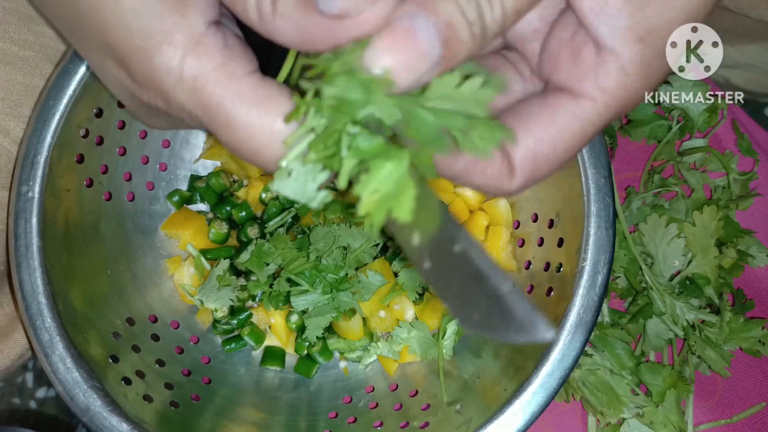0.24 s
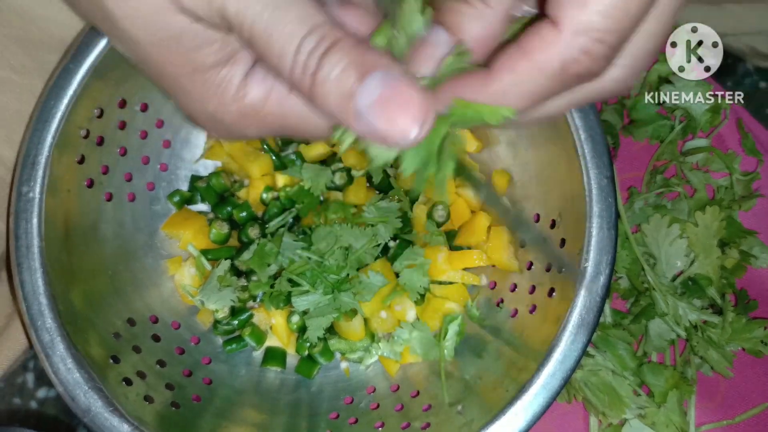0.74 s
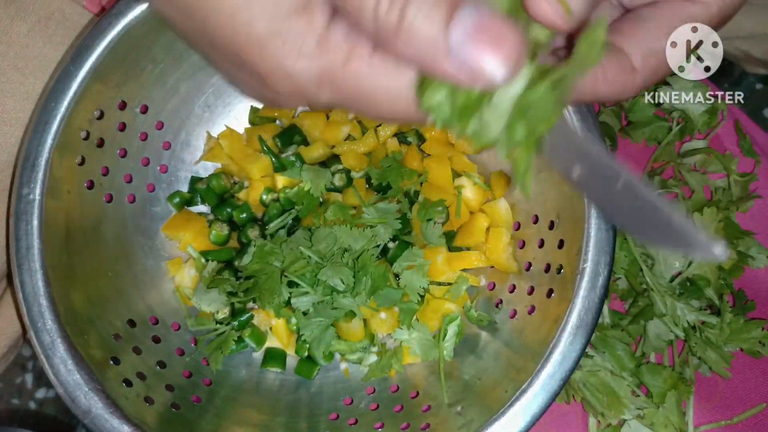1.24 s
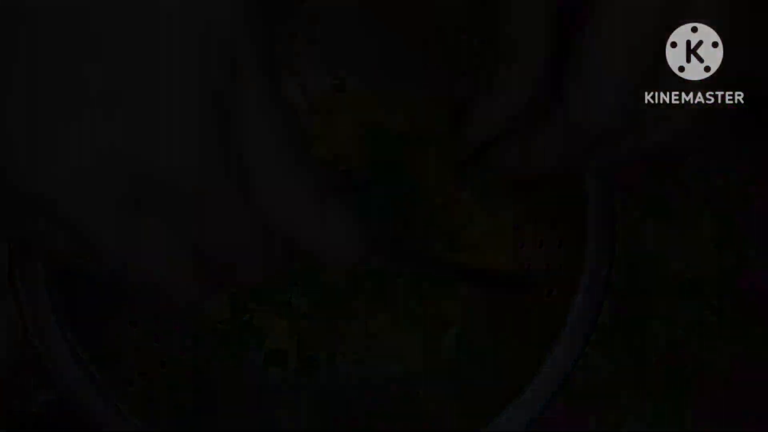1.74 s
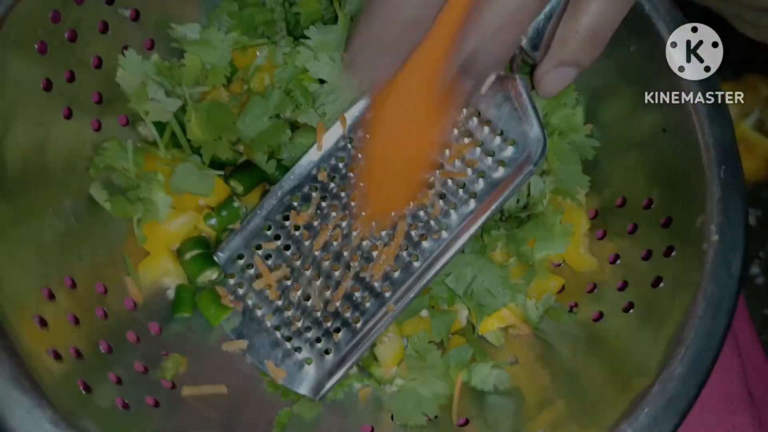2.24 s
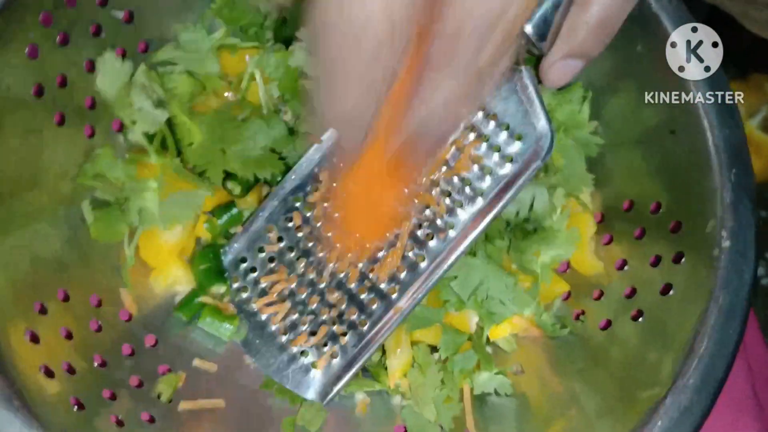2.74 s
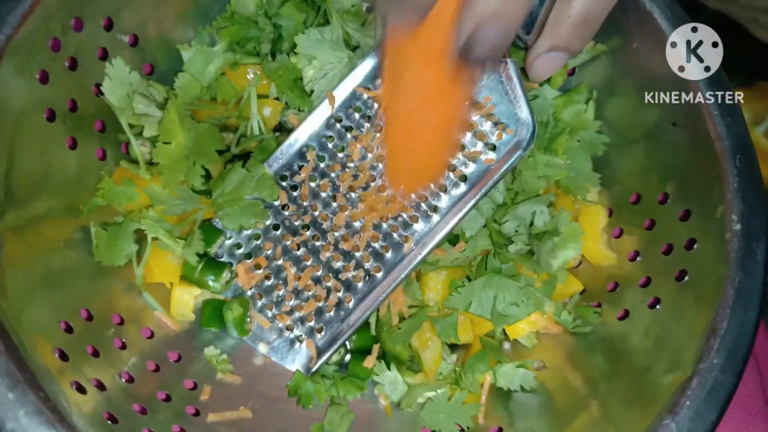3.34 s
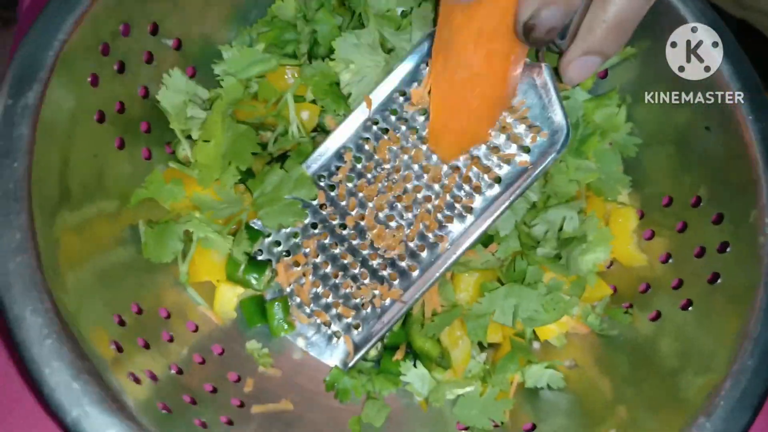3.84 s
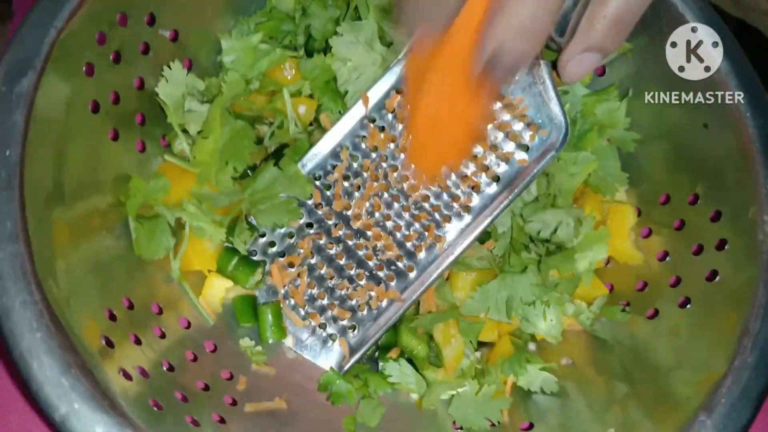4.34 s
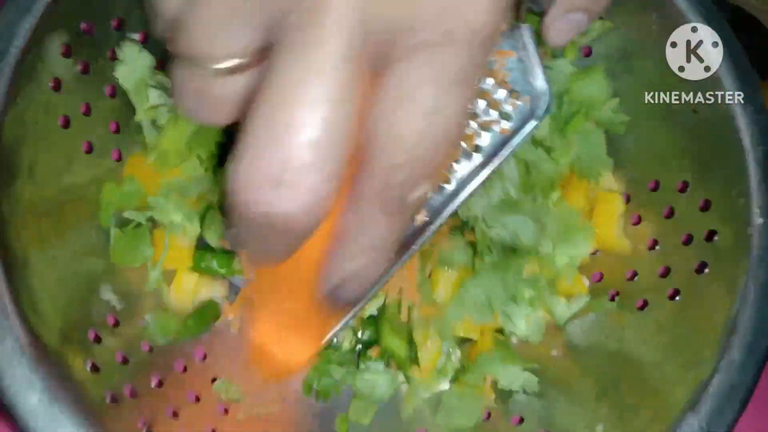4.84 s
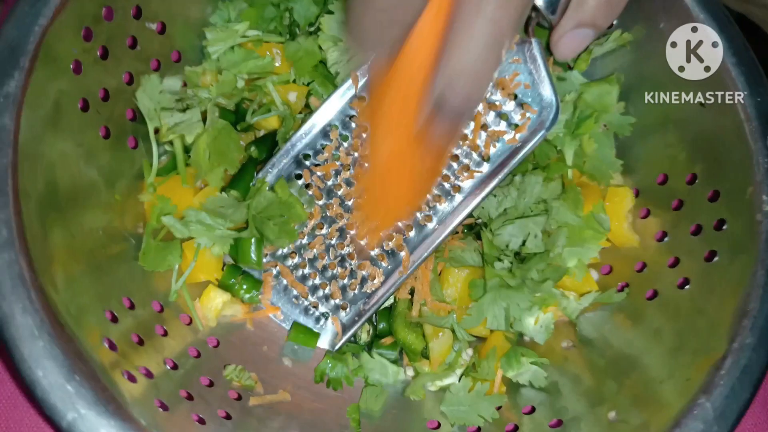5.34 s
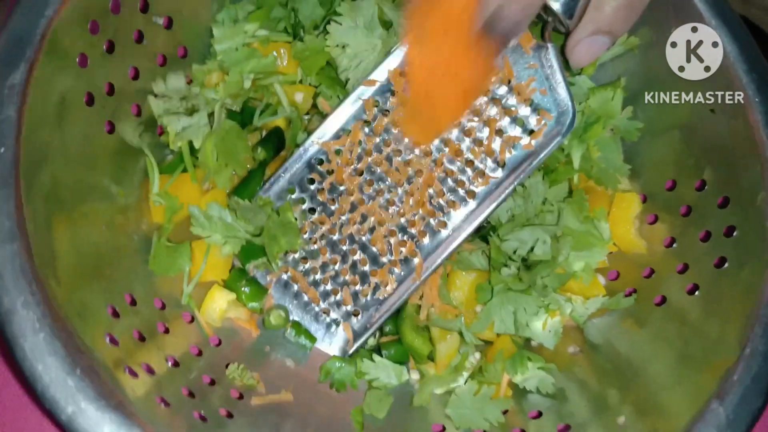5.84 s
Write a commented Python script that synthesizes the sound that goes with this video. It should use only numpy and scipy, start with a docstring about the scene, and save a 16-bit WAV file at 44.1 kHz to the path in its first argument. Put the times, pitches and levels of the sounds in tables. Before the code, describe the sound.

A short, bright click opens the sound. For the first second and a half, herb leaves rustle faintly as they are pulled apart, with tiny stem snaps around 0.8 seconds and three soft, low bumps on a steel colander. From about 1.5 seconds the herbs fade away and the grating of a carrot on a metal grater fades in, reaching full strength near 2.7 seconds. The rasping continues to the end at just past 6 seconds, about three or four strong downstrokes a second with lighter return strokes between them. The downstrokes make the grater judder and the table thump dully, while the colander drones faintly and takes occasional soft knocks. A few small metallic ticks come just before 5 seconds. The grating is close and louder on the left. A low kitchen appliance hum lies underneath, a little louder and boomier during the grating.

```python
"""Tearing herbs, grating a carrot

Hands tear herb leaves over a steel colander; the scene then fades over to a carrot pushed up and down
a flat steel grater resting in it. Teeth shred the carrot with a rasp, rows of teeth make the grater
judder and the table thump, and the colander drones and knocks. Kitchen appliances hum behind it all.
The left microphone port faces the grater; the right one is shaded from it."""
import sys
import numpy as np
from scipy import signal
from scipy.io import wavfile

SR = 44100
rng = np.random.default_rng(int(sys.argv[2]) if len(sys.argv) > 2 else 0)


def materialize(psi):
    """Save the field psi as 16-bit PCM at rate SR to the path in sys.argv[1].

    A 1-D psi becomes a single channel; in a 2-D psi each row is a channel.
    """
    bounded = np.clip(np.atleast_2d(psi).T, -1, 1)
    quanta = np.round(bounded * 32767).astype(np.int16)
    wavfile.write(sys.argv[1], SR, quanta)


N = 268562
T = np.arange(N) / SR

# Strokes down and back up the grater. Each row: bite time, swell length and hold length in seconds,
# crest level in dB, depth of the swell in dB.
STROKES = [(1.557, 0.083, 0.034, -55.0, 9.5), (1.736, 0.061, 0.004, -57.0, 4.5),
           (1.855, 0.043, 0.019, -47.5, 3.5), (2.018, 0.029, 0.022, -51.5, 8.0),
           (2.117, 0.072, 0.01, -41.5, 5.0), (2.257, 0.057, 0.026, -47.0, 11.5),
           (2.373, 0.057, 0.016, -37, 9), (2.546, 0.041, 0.023, -47.5, 5.0),
           (2.647, 0.061, 0.006, -29.0, 16.5), (2.764, 0.092, 0.022, -39.5, 12.0),
           (2.921, 0.054, 0.035, -29.0, 15.5), (3.042, 0.085, 0.024, -43.0, 0.5),
           (3.2, 0.028, 0.054, -36.0, 3.0), (3.342, 0.06, 0.023, -47.0, 0.5),
           (3.465, 0.044, 0.029, -33.0, 8.5), (3.592, 0.061, 0.023, -41.0, 5.5),
           (3.72, 0.06, 0.024, -34.0, 10.0), (3.881, 0.062, 0.004, -42.0, 7.0),
           (3.998, 0.051, 0.03, -33.5, 7.0), (4.146, 0.065, 0.025, -43.0, 10.5),
           (4.279, 0.059, 0.004, -36.0, 3.5), (4.433, 0.046, 0.011, -45.0, 7.5),
           (4.519, 0.008, 0.004, -47.5, 8.0), (4.566, 0.054, 0.017, -33.0, 6.5),
           (4.69, 0.084, 0.004, -38.5, 12.0), (4.845, 0.054, 0.036, -31.0, 8.0),
           (4.963, 0.058, 0.06, -41.0, 0.5), (5.126, 0.065, 0.043, -33.5, 7),
           (5.282, 0.03, 0.056, -43.5, 0.5), (5.426, 0.077, 0.011, -31.5, 5.5),
           (5.565, 0.06, 0.04, -38.0, 7.0), (5.717, 0.055, 0.038, -32.0, 6.0),
           (5.885, 0.07, 0.004, -42.5, 7.5), (6.013, 0.05, 0.06, -34.5, 3.5)]
# Downstrokes that jolt the grater. Each row: time in seconds, judder and thump levels in dB,
# tooth rows passed per second, seconds to build 10 dB, seconds for the judder to die 10 dB.
JOLTS = [ (1.665, -48.5, -62, 243, .1, .03), (1.914, -39.5, -53, 210, .07, .03),
         (2.185, -32.5, -41, 226, .055, .026), (2.446, -27, -35, 252, .029, .015),
         (2.7, -20.5, -28, 175, .008, .028), (2.983, -17.5, -27, 207, .004, .017),
         (3.271, -38, -48, 185, .023, .017), (3.544, -24.5, -26, 184, .014, .01),
         (3.765, -32, -42, 187, .035, .1), (4.045, -31.5, -27, 175, .01, .035),
         (4.348, -29, -35, 253, .058, .015), (4.588, -30, -42, 171, .023, .15),
         (4.89, -36, -34, 150, .1, .06), (5.2, -34, -36, 225, .1, .3), (5.488, -31.5, -37, 191, .05, .021),
         (5.791, -25, -31, 210, .024, .029), (6.072, -35, -34, 237, .035, .3), ]


def from_db(db):
    """Decibels to gain."""
    return 10 ** (np.asarray(db) / 20)


def rms_one(x):
    """Scale to rms 1."""
    return x / np.sqrt(np.mean(x ** 2) + 1e-20)


def at_hz(points, hz):
    """Read a curve on a log-frequency axis."""
    return np.interp(np.log(hz), np.log(np.array(points)[:, 0]), np.array(points)[:, 1])


def panned(x, left_db):
    """Place a sound by its pan: left minus right level in dB."""
    return x * from_db(np.array([left_db / 2, -left_db / 2]).reshape(2, -1))


def filtered(x, order, hz, kind):
    """Butterworth filter."""
    return signal.sosfilt(signal.butter(order, hz, kind, fs=SR, output="sos"), x)


def resonate(x, hz, width_hz):
    """Two-pole resonance with gain 1 at its peak."""
    r = np.exp(-np.pi * width_hz / SR)
    poles = [1, -2 * r * np.cos(2 * np.pi * hz / SR), r * r]
    return signal.lfilter([(1 - r * r) / 2, 0, (r * r - 1) / 2], poles, x)


def drift(rate_hz):
    """Smooth random wander of rms 1."""
    r = np.exp(-80 * np.pi * rate_hz / SR)
    slow = signal.lfilter([1], [1, -2 * r, r * r], rng.standard_normal(N // 40 + 2002))[2000:]
    return np.interp(np.arange(N) / 40, np.arange(len(slow)), rms_one(slow))


def swell(s, peak_db, build_s, die_s, t):
    """Level in dB that climbs 10 dB per build_s to a peak at s, then falls 10 dB per die_s."""
    return peak_db - 10 * np.where(t < s, (s - t) / build_s, (t - s) / die_s)


def grains(per_s, spread_db):
    """Four unrelated streams of tiny clicks of uneven size."""
    sizes = from_db(spread_db * np.minimum(rng.exponential(1, (2, 2, N)), 5))
    clicks = sizes * rng.standard_normal((2, 2, N))
    return rms_one(clicks * (rng.random((2, 2, N)) < per_s / SR))


def banded(source, colour, flicker_db, flicker_hz, balance=((20, 0), (20000, 0))):
    """Stereo texture of half-octave bands, each with its own level, flicker, width and pan; mid rms 1."""
    # How alike the two ports sound. Each row: frequency in Hz, correlation from 0 to 1.
    likeness = [(130, 0.99), (290, 0.89), (640, 0.55), (1400, 0), (3000, 0.0)]
    out, edges = 0, 22 * 2 ** np.arange(0, 9.6, .5)
    for k, (low, high) in enumerate(zip(edges, edges[1:])):
        hz = np.sqrt(low * high)
        if hz < colour[0][0]:
            continue
        mid, side = filtered(source[k % 2], 2, [low, high], "band")
        alike = at_hz(likeness, hz)
        stereo = np.sqrt(1 + alike) * mid + np.sqrt(1 - alike) * side * [[1], [-1]]
        gain = from_db(at_hz(colour, hz) + flicker_db * drift(flicker_hz))
        ports = np.array([[1], [from_db(-at_hz(balance, hz))]])
        out = out + gain * ports / ports.mean() * stereo
    return out / np.sqrt(np.mean(out.mean(axis=0) ** 2))


def pings(rows, cycles):
    """Each row (seconds, dB, Hz) strikes a damped ring that takes so many cycles to fall to 1/e."""
    out, age = np.zeros(N + SR // 8), np.arange(SR // 8) / SR
    for s, db, hz in rows:
        ring = np.sin(2 * np.pi * hz * age) * np.exp(-age * hz / cycles)
        out[int(s * SR):][:len(age)] += from_db(db) * ring
    return out[:N]


def room(colour, air_db, tones, waver_db):
    """Broad room noise and the wavering tones of appliance motors."""
    air = from_db(air_db) * banded(rng.standard_normal((2, 2, N)), colour, flicker_db=2, flicker_hz=6.8)
    hum = 0
    for hz, db in tones:
        amplitude = np.sqrt(2) * from_db(db + waver_db * drift(15))
        hum += amplitude * np.sin(2 * np.pi * hz * T + .86 * drift(1.4))
    return air + hum


def herb_room():
    """Quiet kitchen air and a fairly steady appliance hum behind the herbs."""
    # Colour of the air. Each row: frequency in Hz, relative level in dB.
    colour = [(15, -37), (25, -7), (70, -11.5), (137, -3), (200, -6.5), (248, -9), (299, -8.5), (672, -9.5),
              (791, -12), (2330, -20), (4210, -22), (12400, -32.5), (14600, -35), (15800, -59)]
    # Motor tones. Each row: pitch in Hz, level in dB.
    tones = [(129.2, -70), (253.0, -61), (403.7, -67), (452.2, -68.5), (592.2, -70.5), (667.5, -67.5)]
    return room(colour, air_db=-55, tones=tones, waver_db=1.5)


def leaves():
    """Leaves rub with a fine hiss as they are pulled apart, over a faint rustle of handling."""
    # Pulls. Each row: peak time in seconds, level in dB, seconds to build 10 dB, seconds to die 10 dB.
    pulls = [(0.02, -61.5, .05, .1), (0.234, -58, .047, .032), (0.44, -56.5, .006, .055),
             (0.96, -55, .08, .03), (1.127, -49, .004, .075), (1.274, -61, .008, .3)]
    # Colour of the rustle. Each row: frequency in Hz, relative level in dB.
    colour = [(1120, -48), (1900, -8), (3350, -5.5), (4180, 1.5), (6400, -9), (7910, -7), (10500, -4),
              (14000, -15.5), (15800, -33)]
    handling_db, loud_db = -71, -56
    level_db = np.maximum(handling_db, np.max([swell(*pull, T) for pull in pulls], axis=0))
    left_db = -3 + .65 * np.minimum(level_db - loud_db, 0)   # fainter rustle leans further right
    hiss = banded(grains(per_s=12000, spread_db=1.1), colour, flicker_db=1, flicker_hz=6.3)
    rub = panned(from_db(level_db) * hiss, left_db)
    return rub + from_db(1.5) * resonate(rub, 3350, 600)   # the bowl favours one band


def click_and_snaps():
    """A short, bright click at the very start; the later snaps are stems parting."""
    # The click, then the snaps. Each row: start in seconds, relative level in dB, pan in dB.
    bursts = [(0.0104, -29, 6), (0.7864, -52, -2.5), (0.7916, -43, -0.5), (0.7964, -41, 1.0),
              (0.8034, -52, -1.0), (0.8104, -44, -4), (0.823, -33.5, -1.0), (0.8284, -45, -1.0),
              (0.845, -34, 4), (1.4611, -43, 11), (1.4734, -47, 2)]
    decay_s, envelope = .0017, 0
    for s, db, left_db in bursts:
        decay = (T > s) * np.exp(-np.clip(T - s, 0, None) / decay_s)
        envelope += panned(from_db(db - 4) * decay, left_db)
    return filtered(envelope * rng.standard_normal((2, N)), 2, 3500, "high")


def bumps():
    """Hands nudge the colander into a short, low ring."""
    # Nudges. Each row: start in seconds, level in dB, pitch in Hz.
    nudges = [(0.682, -39.5, 167), (0.941, -39, 159), (1.389, -42, 162)]
    return pings(nudges, cycles=2.1)


def carrot_room():
    """Louder, boomier kitchen air and an unsteady appliance hum behind the grating."""
    # Colour of the air. Each row: frequency in Hz, relative level in dB.
    colour = [(15, -36), (25, -4.5), (184, 9), (352, -6), (437, -8), (812, -14.5), (1930, -16),
              (2590, -13.5), (6660, -39), (14200, -43.5), (15800, -39)]
    # Motor tones. Each row: pitch in Hz, level in dB.
    tones = [(393.0, -61.5), (441.4, -61.5)]
    return room(colour, air_db=-45.5, tones=tones, waver_db=4.8)


def stroke_pressure():
    """Each stroke creeps in, catches abruptly on the teeth, swells, sags while held and lifts off."""
    approach_s, approach_db, catch_s, catch_db = .11, 60, .003, 7
    linger_s, linger_db, lift_s, lift_db = .006, 2.5, .03, 38   # the last teeth linger before the lift
    sag_per_s = 12.5   # share of the swell given back per second of hold
    power = np.zeros(N)
    for s, swell_s, hold_s, crest_db, swell_db in STROKES:
        steps_s = [-approach_s, approach_s - catch_s, catch_s, swell_s, hold_s, linger_s, lift_s]
        times = s + np.cumsum(steps_s)
        sag_db = sag_per_s * swell_db * hold_s
        below_crest_db = np.array([swell_db + approach_db, swell_db + catch_db, swell_db, 0,
                                   sag_db, sag_db + linger_db, sag_db + lift_db])
        span = slice(int(times[0] * SR), int(times[-1] * SR))
        power[span] += from_db(2 * np.interp(T[span], times, crest_db - below_crest_db))
    return np.sqrt(power)


def jolted_strokes():
    """Start and end in seconds of the shaking around each jolt: its stroke plus time to settle."""
    settle_s = .014
    s, swell_s, hold_s = np.array(STROKES).T[:3]
    which = np.searchsorted(s, [jolt[0] for jolt in JOLTS]) - 1
    return np.c_[s, s + swell_s + hold_s + settle_s][which]


def tooth_rows():
    """Phase of the tooth rows passing under the carrot at an uneven rate, one cycle a row."""
    row_hz = np.interp(T, jolted_strokes().ravel(), np.repeat([jolt[3] for jolt in JOLTS], 2))
    return 2 * np.pi * np.cumsum(row_hz * (1 + .086 * drift(27))) / SR


def rasp(pressure, row_phase):
    """Fibres tear on many teeth at once, throbbing as each row bites, and ring the plate and teeth."""
    # Colour of the shredding. Each row: frequency in Hz, relative level in dB.
    colour = [(530, -27), (900, -19), (1290, -10.5), (1540, -12), (1940, -4.5), (2350, -8), (2850, -8),
              (3980, -6.5), (8780, -4), (11400, -24), (14900, -5), (15800, -23)]
    # Shading of the right port. Each row: frequency in Hz, left minus right in dB.
    shade = [(60, 0.0), (110, 0.5), (200, 1.0), (380, 40), (700, 4.5), (1290, 12.5), (2380, 3), (4400, 12),
             (8120, 17), (15000, 20)]
    # Grater plate resonances at the left port. Each row: frequency in Hz, width in Hz, gain in dB.
    plate_modes = [(1270, 47, -1.5), (1860, 70, 6.5), (2005, 60, 11.5), (3920, 130, 3)]
    # Resonance at the right port. Each row: frequency in Hz, width in Hz, gain in dB.
    shaded_peak = [(3470, 170, 12.5)]
    fibres = grains(per_s=9000, spread_db=2.3)
    left, right = banded(fibres, colour, flicker_db=2, flicker_hz=26.8, balance=shade)
    plate = sum(from_db(db + 4.6 * drift(60)) * resonate(left, hz, width)
                for hz, width, db in plate_modes)
    teeth_hz = np.geomspace(1100, 9500, 36) * from_db(.2 * rng.standard_normal(36))
    teeth = sum(from_db(-6 + 6 * drift(30)) * resonate(left, hz, 170) for hz in teeth_hz)
    shaded_ring = sum(from_db(db) * resonate(right, hz, width) for hz, width, db in shaded_peak)
    throb = from_db(.4 * np.sin(row_phase) + 1.4 * drift(45))
    return from_db(-5.5) * pressure * throb * np.array([left + plate + teeth, right + shaded_ring])


def wall_echoes(x, t60_s, level_db):
    """The kitchen walls return a dull, diffuse tail, different at each port."""
    age = np.arange(SR // 3) / SR
    tail = signal.lfilter([1], [1, -.55], rng.standard_normal((2, len(age))))
    tail *= from_db(-60 * age / t60_s)
    tail *= from_db(level_db) / np.sqrt(np.sum(tail ** 2, axis=1, keepdims=True))
    return signal.oaconvolve(x, tail, axes=1)[:, :N]


def jolt_gains():
    """Judder and thump envelopes: each peaks at the jolt and shuts quickly outside its stroke."""
    edge_db, rise_s, fall_s, thump_slower = 12, .012, .015, 1.3
    power = np.zeros((2, N))
    for (s, judder_db, thump_db, _, build_s, die_s), (start, end) in zip(JOLTS, jolted_strokes()):
        span = slice(int((start - .1) * SR), int((end + .15) * SR))
        t = T[span]
        gate_db = edge_db * (np.maximum(start - t, 0) / rise_s + np.maximum(t - end, 0) / fall_s)
        power[0, span] += from_db(2 * (swell(s, judder_db, build_s, die_s, t) - gate_db))
        power[1, span] += from_db(2 * (swell(s, thump_db, build_s, thump_slower * die_s, t) - gate_db))
    return np.sqrt(power)


def shake(pressure, row_phase):
    """Passing tooth rows rock and rattle the grater; the table answers with a dull thump."""
    rock = np.sin(row_phase) * from_db(1.6 * drift(29))
    rattle = resonate(resonate(rng.standard_normal((2, N)), 212, 218), 160, 182)
    judder = rms_one(rock) + .72 * rms_one(rattle[0]) + .49 * rms_one(rattle[1]) * [[1], [-1]]
    judder = rms_one(filtered(judder, 4, [95, 330], "band"))
    push = filtered(rng.standard_normal((2, N)), 3, [24, 85], "band")
    thump = panned(rms_one(push[0] + .45 * push[1] * [[1], [-1]]), left_db=-2.5)
    # Even the light return strokes shake the grater, in step with their rasp.
    judder_gain, thump_gain = jolt_gains() + from_db([[-5], [-8]]) * pressure
    return judder_gain * judder + thump_gain * thump


def colander_drone(pressure):
    """The colander drones under each stroke, growing more slowly than the rasp."""
    mid, side = resonate(resonate(rng.standard_normal((2, N)), 577, 285), 590, 470)
    drone = rms_one(mid + .55 * side * [[1], [-1]]) * from_db(1.7 * drift(28))
    return panned(from_db(-24) * pressure ** .65 * drone, left_db=6.2)


def knocks():
    """The grater's edge rings the colander with soft knocks; a few dull puffs land to the right."""
    # Contacts. Each row: start in seconds, relative level in dB, pan in dB.
    contacts = [(2.394, -27, 4), (2.429, -31, 4), (3.731, -27.5, 6), (3.994, -32, 3.0), (4.042, -19.5, 7),
                (4.277, -24, 6), (4.402, -24.5, 7), (4.525, -36.5, 5), (4.822, -29, 8), (4.862, -17.5, 3),
                (5.122, -29, 3), (5.701, -30, 4), (5.815, -21, 1.5), (5.9, -35, -15)]
    # Colander modes. Each row: frequency in Hz, gain in dB, cycles to fall to 1/e.
    modes = [(245, 1.5, 1.28), (622, -10.5, 3.0), (1120, -26, 3.6)]
    # Low puffs. Each row: start in seconds, relative level in dB, pitch in Hz.
    puffs = [(4.88, -3.5, 61.5), (4.895, -6, 105.2), (5.358, -17, 84.6)]
    rings = sum(panned(pings([(s, db + mode_db, hz)], cycles), left_db)
                for s, db, left_db in contacts for hz, mode_db, cycles in modes)
    rings += from_db([[-14], [-1]]) * pings(puffs, cycles=.54)
    return filtered(rings, 2, 1400, "low")   # rounds off each attack


def tooth_ticks():
    """Single teeth let go and ping, close to the left port."""
    # Ticks. Each row: start in seconds, level in dB, pitch in Hz, cycles to fall to 1/e.
    ticks = [(3.733, -33, 3800, 2), (4.932, -31, 7300, 50), (4.9645, -28, 7400, 30),
             (4.974, -30, 2000, 1.5), (4.9835, -27, 4800, 2)]
    return panned(sum(pings([(s, db, hz)], cycles) for s, db, hz, cycles in ticks), left_db=5.88)


def scene():
    """Two moments in the kitchen: the herbs fade away as the grating starts and its room fades in."""
    fade_start_s, fade_end_s = 1.45, 3
    fade = np.clip((T - fade_start_s) / (fade_end_s - fade_start_s), 0, 1)
    pressure, row_phase = stroke_pressure(), tooth_rows()
    shaking = shake(pressure, row_phase)
    rasping = rasp(pressure, row_phase)
    herbs = (1 - fade) * herb_room() + (1 - fade) ** 2 * (leaves() + click_and_snaps()) + bumps()
    carrot = fade * carrot_room() + shaking + rasping + wall_echoes(rasping, t60_s=.25, level_db=-16)
    carrot += fade ** 2 * colander_drone(pressure) + knocks() + tooth_ticks()
    port_lag_s = .0002   # the right port hears the grater later
    carrot[1] = np.pad(carrot[1], (round(port_lag_s * SR), 0))[:N]
    return herbs + carrot


def record(dry):
    """A steep low-pass cuts the very top of the treble."""
    cutoff_hz = 15650
    return signal.sosfilt(signal.ellip(12, .5, 70, cutoff_hz, fs=SR, output="sos"), dry)


dry = scene()
out = record(dry)
materialize(out)
```